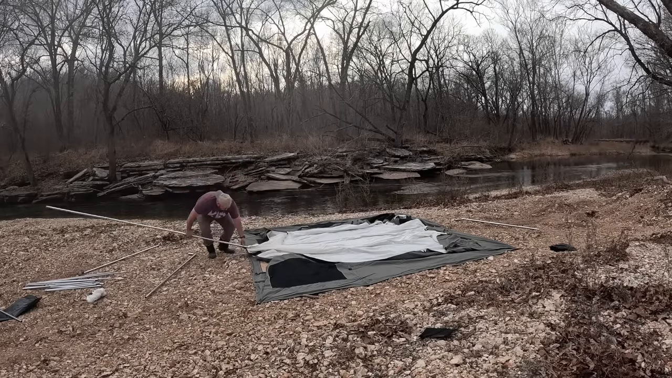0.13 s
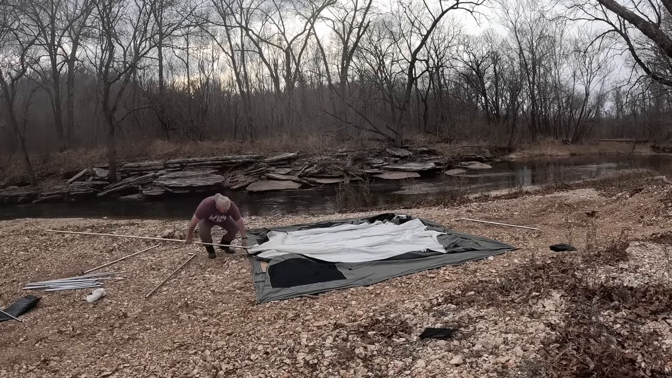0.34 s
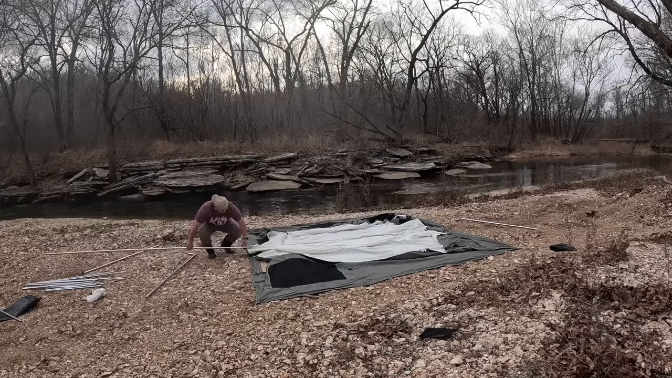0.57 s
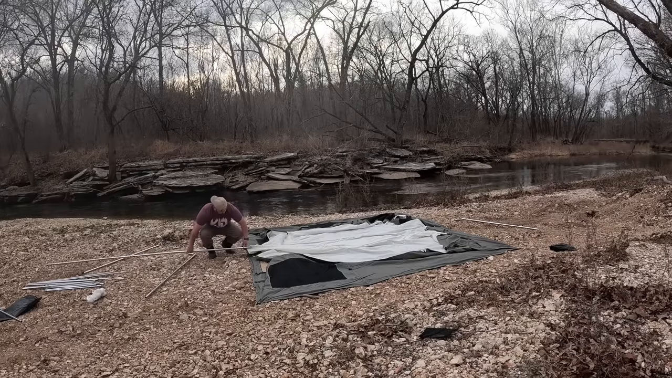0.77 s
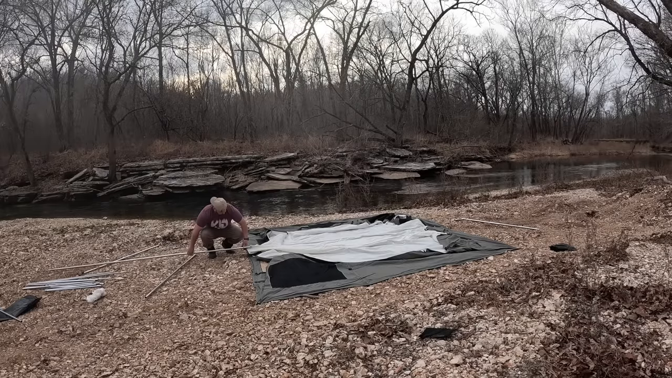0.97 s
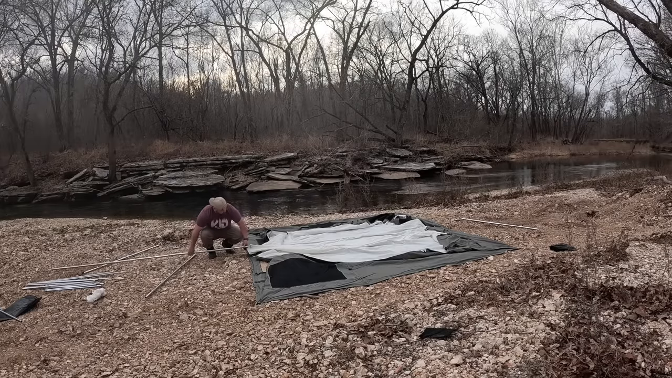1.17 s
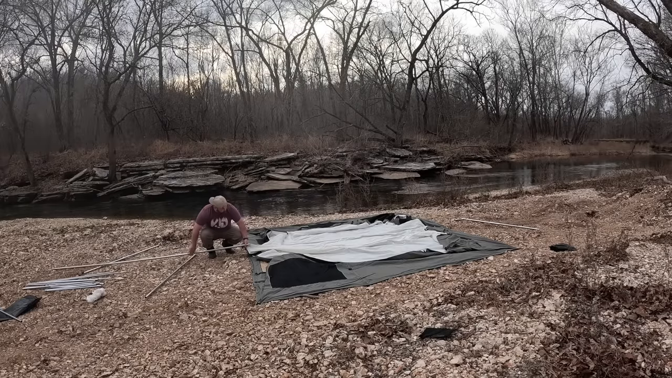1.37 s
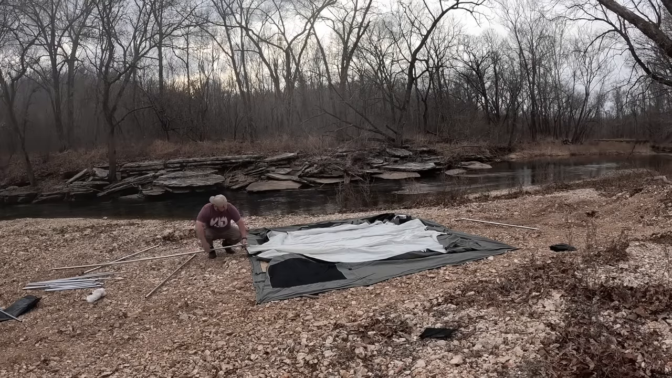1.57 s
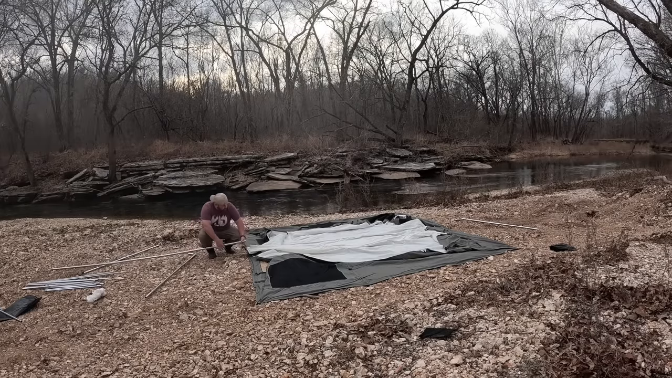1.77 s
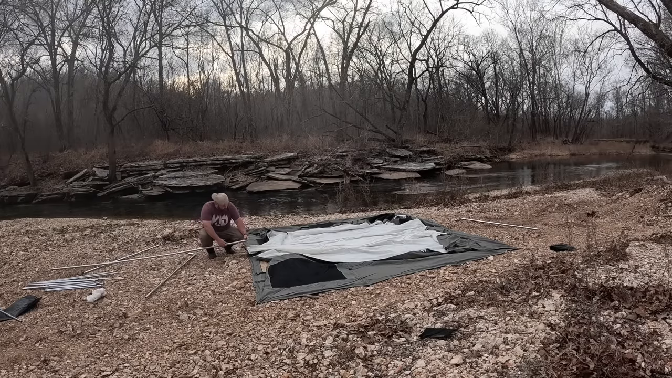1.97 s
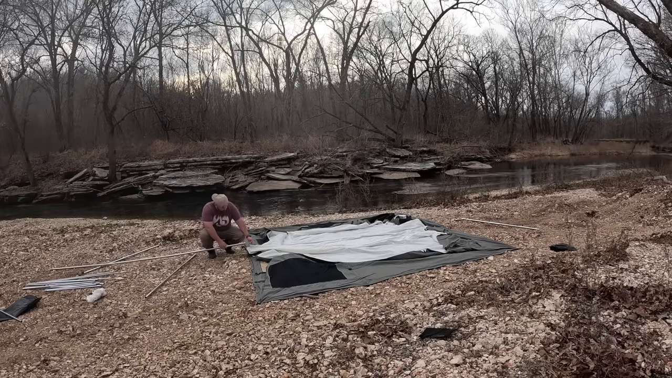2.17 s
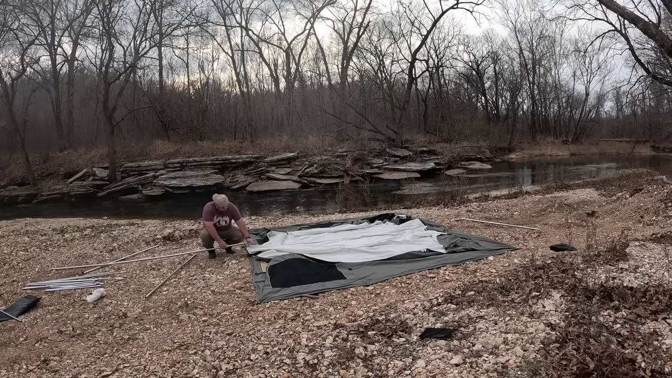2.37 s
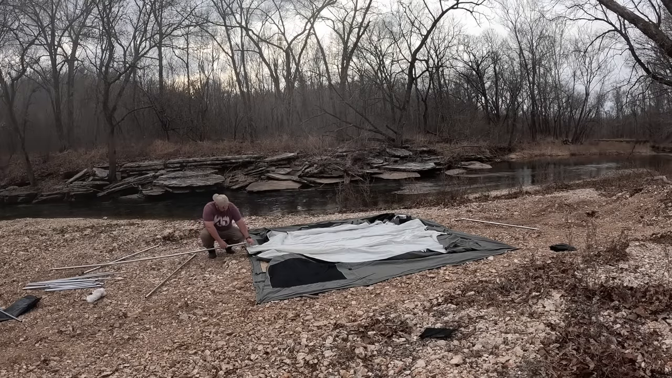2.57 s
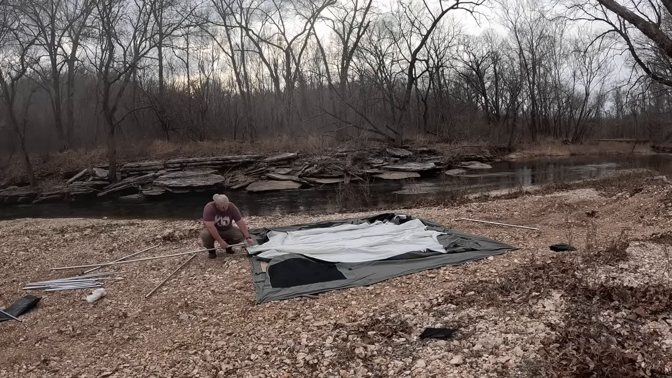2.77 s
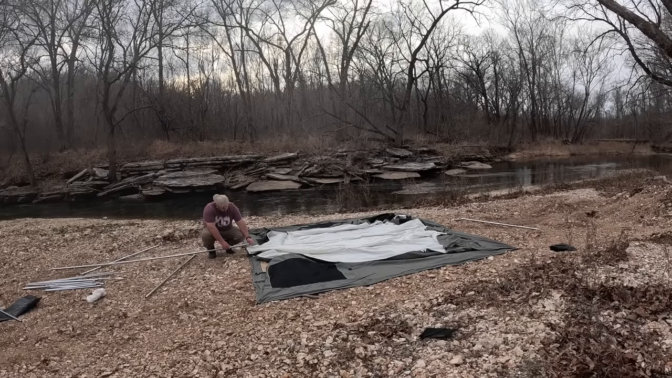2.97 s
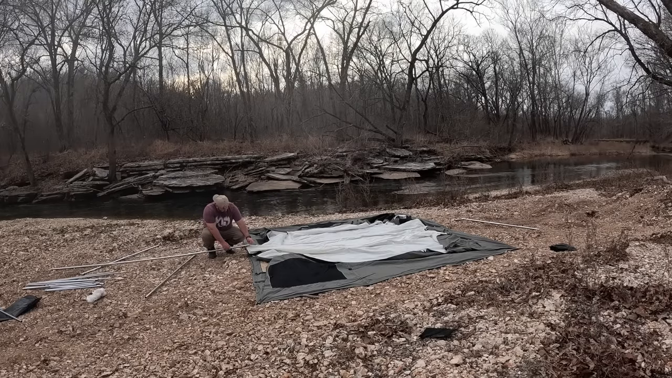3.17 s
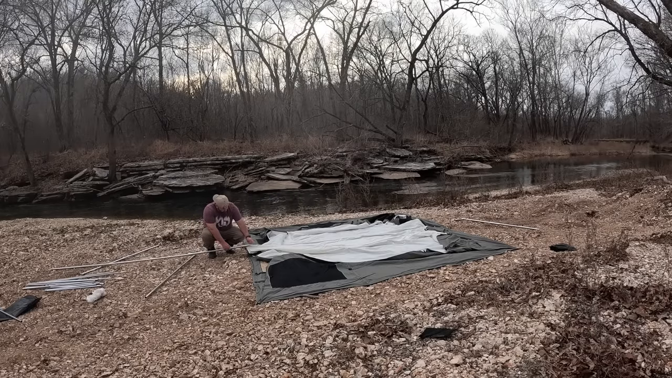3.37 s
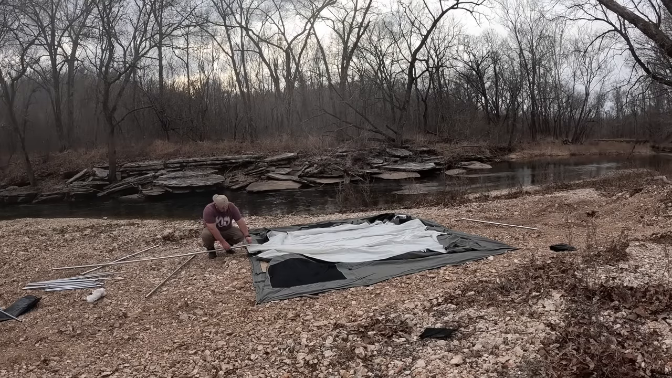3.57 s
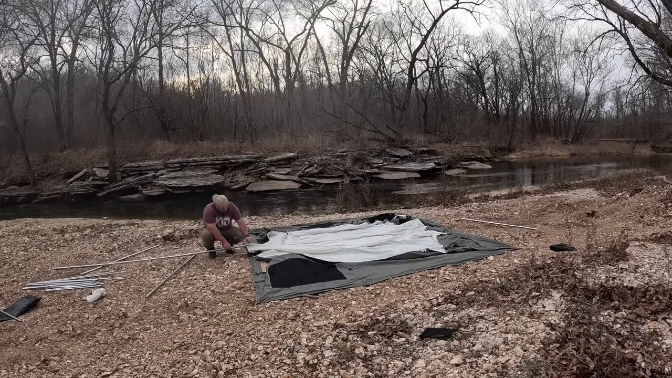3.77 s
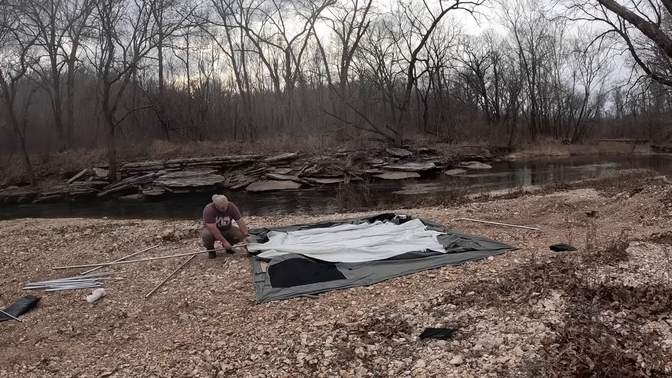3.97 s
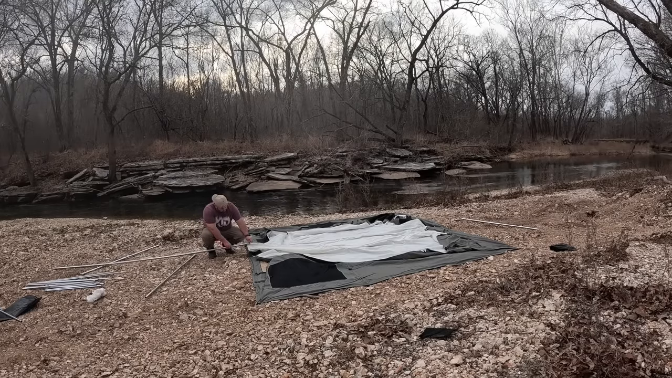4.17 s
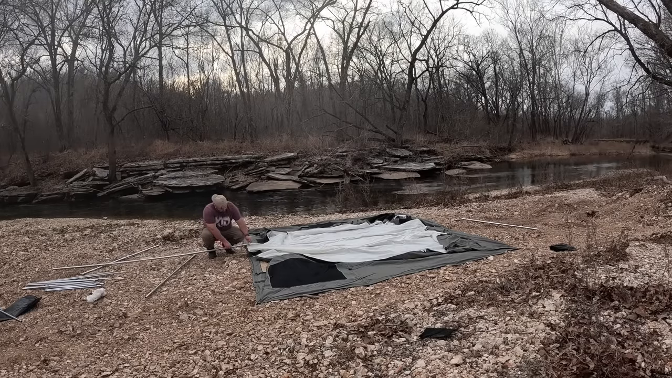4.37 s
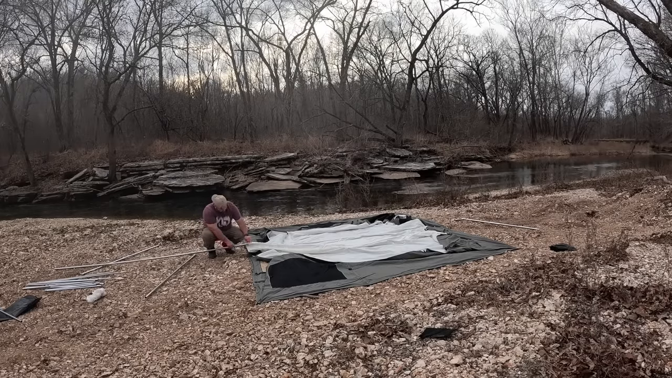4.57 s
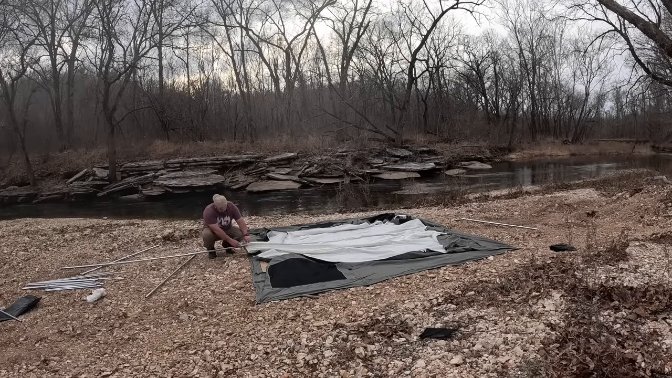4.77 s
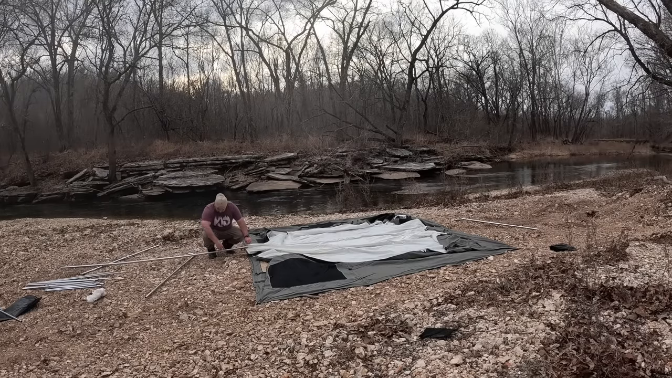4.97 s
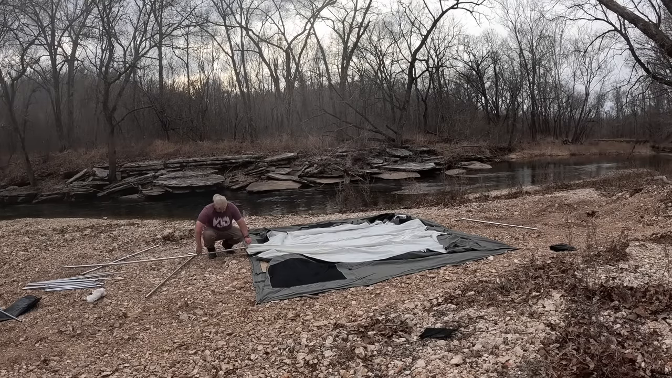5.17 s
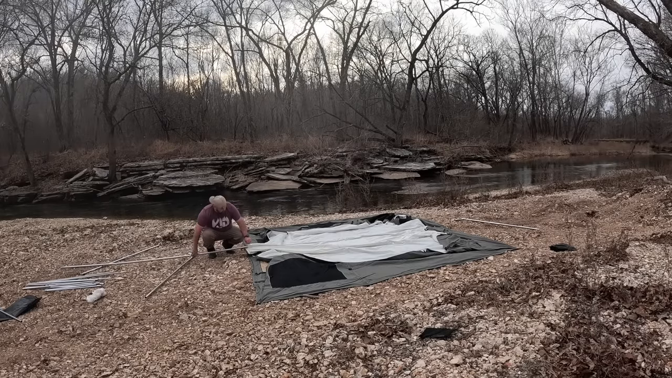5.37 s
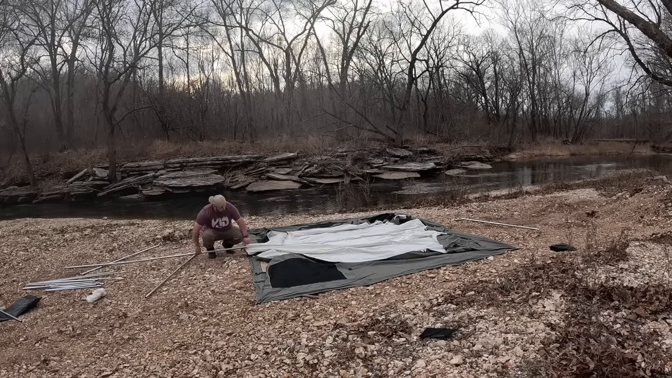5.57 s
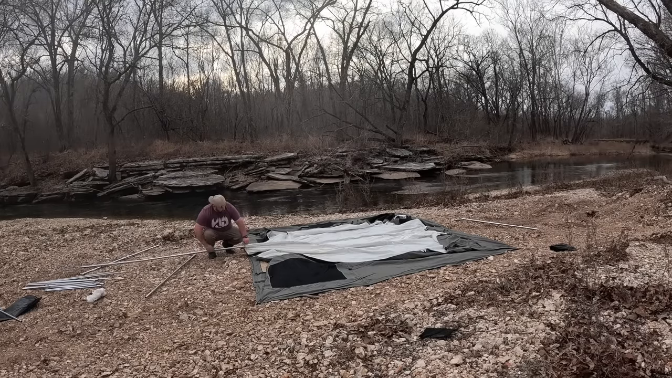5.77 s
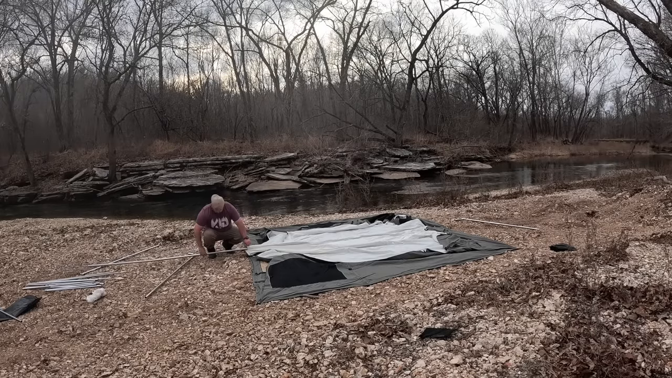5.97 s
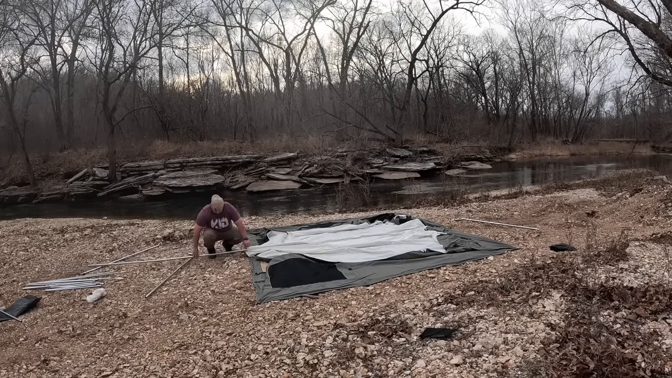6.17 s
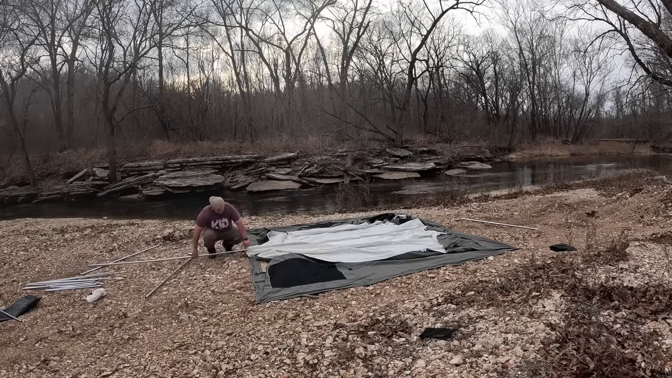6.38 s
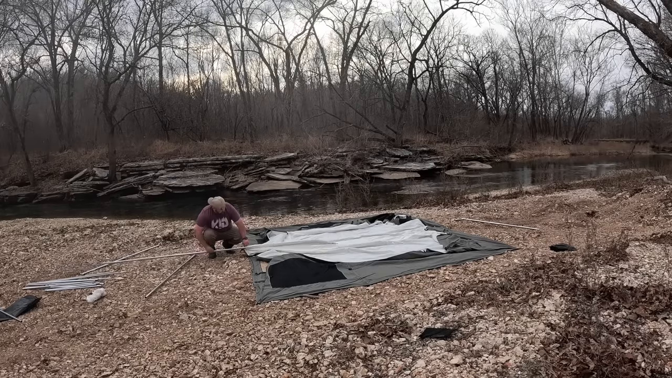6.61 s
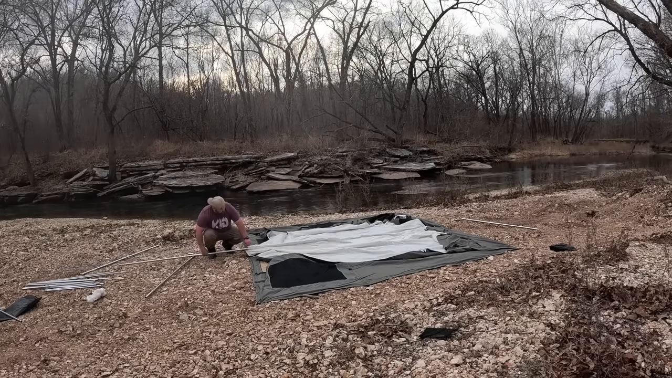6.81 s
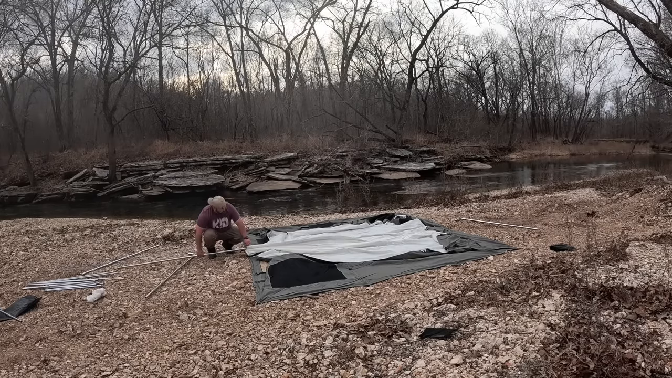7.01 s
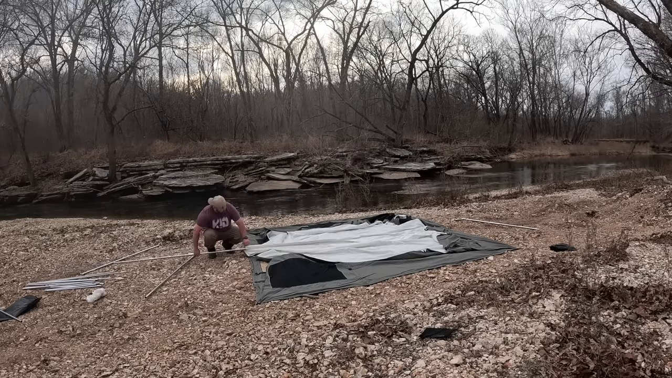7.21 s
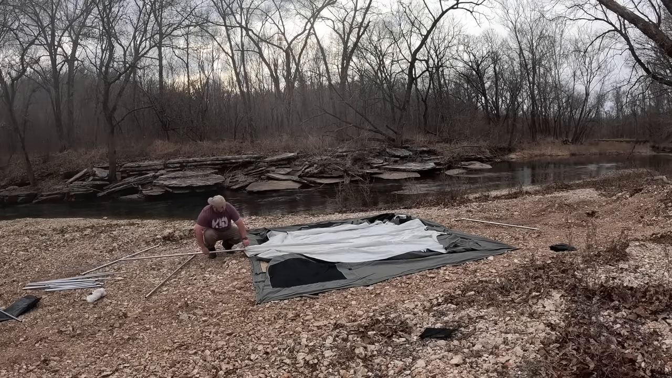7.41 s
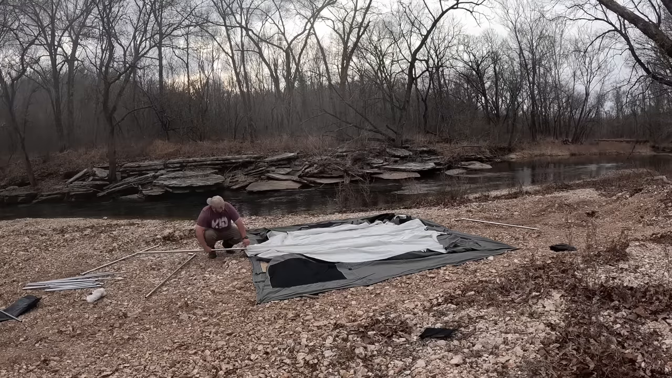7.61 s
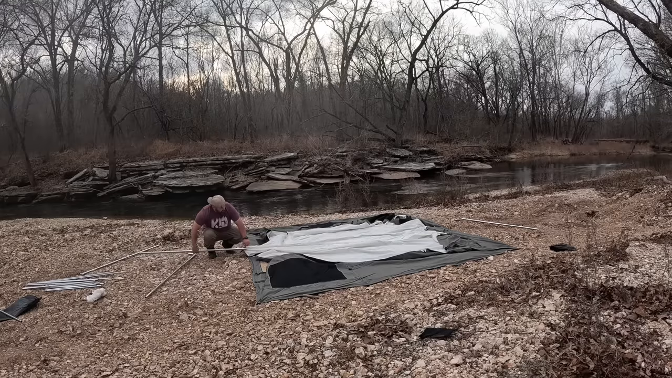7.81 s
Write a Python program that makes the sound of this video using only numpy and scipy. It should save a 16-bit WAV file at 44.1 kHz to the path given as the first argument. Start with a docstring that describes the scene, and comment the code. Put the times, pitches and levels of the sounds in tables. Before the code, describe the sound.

A shallow creek gives a soft, steady, wide hiss throughout, with tiny bubbles and a low, uneven breeze rumble on the microphones. From 0.1 to 0.9 s, pebbles crunch and tick underfoot in quick succession while cloth rubs faintly. At 1.0 s a thin metal pole knocks in a tight, bright cluster, followed by small taps and short scrapes until about 1.9 s. Then it is calmer: odd stone ticks at 2.4 to 3.1 s and a faint, falling far bird chirp near 3.4 s. Light rubbing and taps return at 4.2 to 5.0 s. From 5.57 to 5.9 s comes the strongest scraping, with rattling metallic knocks. Near 6.4 s the pole slides again, briefly squeaking, with a zip rising and falling until 6.8 s. Crisp clinks ring at 6.98 and 7.07 s, then a fainter zip at 7.4 to 7.65 s fades into the creek. The pole sits slightly left, nearly dry.

```python
"""A shallow creek hisses and a light breeze rumbles on the microphones throughout, while pebbles tick underfoot
and thin metal tent poles are pushed through a fabric sleeve, a little to the left.
Knocks and slips ring the pole's modes, filtered noise makes cloth, stones, creek and breeze,
and plain tones, gliding or steady, make the zips along the weave, short tones of the pole and a far bird."""
import sys
import numpy as np
from scipy import signal
from scipy.fft import rfft, irfft, next_fast_len
from scipy.io import wavfile
from scipy.ndimage import uniform_filter1d

SR = 44100
rng = np.random.default_rng(int(sys.argv[2]) if len(sys.argv) > 2 else 0)


def pcm_store(signal):
    """Save signal as 16-bit PCM."""
    levels = np.round(np.clip(np.atleast_2d(signal), -1, 1) * 32767)
    wavfile.write(sys.argv[1], SR, levels.astype(np.int16).T)


N = 346175  # length in samples
SIDES = np.array([[1], [-1]])  # adds to the left, subtracts from the right
POLE_PAN_DB = 2.5  # left minus right


def undb(db):
    """Turn decibels into a plain gain."""
    return 10 ** (np.asarray(db) / 20)


def level(x, db):
    """Scale a sound to an average (RMS) level."""
    return x * undb(db) / np.sqrt(np.mean(x ** 2))


def peak(x, db):
    """Scale a sound so that its highest point sits at db."""
    return x * undb(db) / np.abs(x).max()


def pan(db):
    """Left and right gains, db apart; positive leans left."""
    return undb(np.array([db, -db]).reshape(2, -1) / 2)


def curve(rows):
    """Columns of a time table, drawn as lines with one value a sample."""
    s, *columns = np.transpose(rows)
    return [np.interp(np.arange(N) / SR, s, column) for column in columns]


def spectrum(rows, hz):
    """Read a frequency table at hz, with straight lines over log frequency."""
    table_hz, value = np.transpose(rows)
    return np.interp(np.log(hz), np.log(table_hz), value)


def band(x, hz, width):
    """Keep a soft peak around hz, width in Hz."""
    return signal.lfilter(*signal.iirpeak(hz, hz / width, SR), x)


def between(x, lo_hz, hi_hz):
    """Band-pass with steep skirts."""
    return signal.sosfilt(signal.butter(4, [lo_hz, hi_hz], "bandpass", fs=SR, output="sos"), x)


def mode(x, hz, t60):
    """Damped resonance that falls 60 dB in t60 seconds; a unit impulse rings with amplitude near 1."""
    r = 1000 ** (-1 / (max(t60, .01) * SR))
    return signal.lfilter([.5, 0, -.5], [1, -2 * r * np.cos(2 * np.pi * hz / SR), r * r], x)


def walk(rate, size=N):
    """Smooth random wandering: levels held 1 / rate s and slewed twice; spread near 1."""
    held = np.repeat(rng.standard_normal(int(size * rate / SR) + 3), 8)
    smooth = uniform_filter1d(uniform_filter1d(held, 8), 8)
    return 1.3 * np.interp(np.arange(size) * 8 * rate / SR, np.arange(len(held)), smooth)


def burst(decay_s, size=2000):
    """Noise that starts at once and dies away; peak near 1."""
    return rng.standard_normal(size) / 2 * np.exp(-np.arange(size) / (SR * max(decay_s, 1e-4)))


def add(out, s, sound):
    """Mix a sound into out, starting at s seconds."""
    i = int(s * SR)
    out[..., i:i + sound.shape[-1]] += sound[..., :N - i]


# breeze rumble before its random wobble: t/s, level/dB
GUST_LEVELS = [(0.0, -78), (0.11, -68), (0.35, -72), (1.05, -71.5), (1.66, -79), (1.68, -70), (3.48, -68),
               (3.63, -80), (3.78, -65), (3.87, -79), (4.28, -68.5), (6.71, -71), (6.75, -61.5),
               (7.08, -73), (7.22, -58.5), (7.3, -76), (7.54, -59.5), (7.85, -71)]


def breeze():
    """Slow pressure swings on the microphone ports, mostly shared by both: noise below about 52 Hz."""
    low_pass = signal.butter(3, 52, fs=SR, output="sos")
    shared, own = signal.sosfilt(low_pass, rng.standard_normal((2, N)))
    pair = shared + 0.17 * own * SIDES
    return level(pair, 0) * undb(curve(GUST_LEVELS)[0] + 2.4 * walk(14)) * pan(-1.6)


# colour of the creek: f/Hz, relative level per Hz/dB
CREEK_COLOUR = [(41, -24), (70, -18), (112, -19.5), (156, -2), (390, -11.5), (697, -10), (833, -12.5),
                (1140, 0), (1860, -2.5), (4440, -12.5), (7420, -19.5), (8870, -28.5), (11900, -32.5),
                (14500, -45)]
# how alike left and right are: f/Hz, likeness [0-1]
CREEK_LIKENESS = [(60, 0.76), (130, 0.81), (290, 0.52), (640, 0.34), (1410, 0.61), (3100, 0.49),
                  (6820, 0.6), (15000, 0.094)]
# which side is louder: f/Hz, left minus right level/dB
CREEK_LEAN = [(60, -3), (110, -7), (200, -6), (380, -6.5), (700, -0.5), (1290, 6), (2380, 7.5), (4400, 2),
              (8120, 2), (15000, 9)]
# slow changes of the water: t/s, change of level/dB, extra lean to the left/dB
CREEK_FLOW = [(0, 1.3, -0.5), (1.5, -1.5, 0.5), (4, 0, 1), (6, -0.1, 0.5), (7.85, -0.5, -0.5)]
CREEK_DB = -56.5  # average level before the flow changes


def creek(bubbles=220, bubble_db=-9):
    """Third-octave noise bands swell together and flicker alone; small rising bubbles (per s) lie on top."""
    water, swell, size = 0, walk(1.924), next_fast_len(N)
    hz = np.maximum(np.fft.rfftfreq(size, 1 / SR), 1)
    noise = rfft(rng.standard_normal((2, size))) * undb(spectrum(CREEK_COLOUR, hz))
    octave = np.log2(hz)
    for centre_hz in 90 * 2 ** np.arange(0, 7.5, 1 / 3):
        # a triangle that reaches a third of an octave each way
        mid, side = noise * np.clip(1 - 3 * np.abs(octave - np.log2(centre_hz)), 0, 1)
        like = np.clip(spectrum(CREEK_LIKENESS, centre_hz), 0, 1)
        pair = np.sqrt(1 + like) * mid + np.sqrt(1 - like) * side * SIDES
        pair = pan(spectrum(CREEK_LEAN, centre_hz)) * pair
        water = water + undb(0.81 * swell + 1.02 * walk(9)) * irfft(pair, size)[:, :N]

    drops, t = np.zeros(N), np.arange(900) / SR
    for when, pitch, strength in rng.random((int(bubbles * N / SR), 3)):
        f = 1000 * 2.6 ** pitch
        rising_tone = np.sin(2 * np.pi * f * t * (1 + .004 * f * t))
        # cubing makes most bubbles faint
        add(drops, when * N / SR, strength ** 3 * np.exp(-t * f / 6) * rising_tone)

    both = level(water, CREEK_DB) + level(drops, CREEK_DB + bubble_db) * pan(3.4)
    flow_db, lean_db = curve(CREEK_FLOW)
    return both * undb(flow_db) * pan(lean_db)


# pebbles underfoot, peaks before panning: t/s, treble level/dB, middle level/dB, thud level/dB
PEBBLE_STEPS = [(0.11, -44.5, -50, -70), (0.1217, -52, -47, -62), (0.163, -47, -43, -57),
                (0.204, -46, -49, -57), (0.263, -43, -41, -56.5), (0.2812, -41.5, -48, -74),
                (0.3147, -41, -34, -50), (0.3887, -59, -37.5, -52), (0.479, -45, -39.5, -57),
                (0.5436, -45, -49, -57), (0.5939, -44, -55, -61), (0.736, -38, -61, -45),
                (0.8603, -44.5, -45, -73), (0.9366, -53, -49, -63), (2.435, -47, -49, -63),
                (2.7237, -53, -46, -85), (2.9796, -55, -57, -69), (3.13, -64, -45.5, -88),
                (3.5994, -66, -54, -81), (3.8494, -50, -67, -81), (4.0576, -50, -61, -71),
                (4.4102, -44.5, -61, -60), (5.194, -46, -43, -83), (5.34, -48, -64, -80),
                (1.717, -58, -44, -61), (4.97, -62, -54, -55.5), (5.05, -66, -48, -63),
                (7.0, -66, -41, -51)]


def pebbles():
    """Stone ticks with a short middle knock and a dull thud of the ground: three filtered noise bursts."""
    out = np.zeros(N)
    for s, tick_db, mid_db, thud_db in PEBBLE_STEPS:
        tick = between(burst(0.0024), 2250, 7830) + 0.17 * between(burst(0.0011), 9600, 12000)
        knock = band(burst(0.0015), 1210, 310)
        thud = band(band(burst(0.025), 230, 150), 230, 390)
        for sound, db in (tick, tick_db), (knock, mid_db), (thud, thud_db):
            add(out, s, peak(sound, db))
    return out * pan(2.1)


# far bird: t/s, f/Hz, nominal level/dB
BIRD_CHIRP = [(3.38, 3430, -65), (3.43, 3350, -65), (3.5, 2700, -61)]
# the weave zips under the sliding tip, pitch follows speed; one list a zip: t/s, f/Hz, nominal level/dB
WEAVE_ZIPS = [
    [(6.5, 1547, -58), (6.55, 2080, -54), (6.588, 2593, -54), (6.62, 2990, -47), (6.645, 3195, -52),
     (6.665, 3160, -49), (6.7, 2980, -55), (6.73, 2886, -52), (6.765, 2720, -62), (6.8, 1850, -57.5),
     (6.83, 1569, -65)],
    [(7.36, 1255, -60.5), (7.384, 1627, -57), (7.466, 2657, -62), (7.526, 2941, -57.5), (7.618, 2200, -65),
     (7.66, 1971, -72)],
]


def zips(width_hz=260, clean=0.51, uneven_db=4.5):
    """A gliding tone: threads plucked in turn, unevenly, part line and part narrow noise; a far bird blurs alike."""
    out = np.zeros(N)
    for rows in [*WEAVE_ZIPS, BIRD_CHIRP]:
        hz, db = curve(rows)
        start, end = rows[0][0], rows[-1][0]
        inside = np.interp(np.arange(N) / SR, [start - .02, start, end, end + .02], [0, 1, 1, 0])
        blur = clean + 0.68 * walk(width_hz) + 0.37 * walk(900)
        tone = np.sqrt(2) * np.sin(2 * np.pi * np.cumsum(hz) / SR)
        out += inside * undb(db + uneven_db * walk(30)) * blur * tone
    return out * pan(0.5)


# pushes of the pole along the sleeve: start t/s, rise t/s, hold t/s,
# relative slip force level/dB, relative cloth hiss level/dB
PUSHES = [(0.085, 0.03, 0.43, -72, -71), (0.704, 0.022, 0.03, -69.5, -67), (1.013, 0.018, 0.12, -62, -71),
          (1.266, 0.018, 0.082, -67, -72), (1.392, 0.035, 0.041, -60, -61), (1.52, 0.037, 0.091, -69, -71),
          (1.707, 0.037, 0.034, -64.5, -74), (1.896, 0.038, 0.085, -71.5, -80),
          (2.403, 0.045, 0.56, -78, -84), (2.897, 0.096, 0.02, -68, -70), (3.494, 0.036, .25, -82, -81),
          (3.83, 0.042, 0.3, -75, -79), (4.404, 0.068, 0.067, -64, -66), (4.552, 0.016, 0.22, -59, -60.5),
          (4.967, 0.02, 0.02, -77, -78), (5.3, 0.047, 0.43, -79, -74), (5.57, 0.017, .03, -56, -57),
          (5.618, .02, 0.16, -50, -53), (5.76, 0.013, 0.022, -54, -53.5), (5.827, .01, 0.046, -49.5, -52),
          (5.894, 0.0088, 0.016, -59, -61), (6.41, 0.12, 0.02, -52.5, -57.5),
          (6.589, 0.048, 0.14, -66, -62), (6.732, 0.043, 0.058, -69, -58.5),
          (7.084, 0.017, 0.046, -69, -66), (7.303, 0.06, 0.38, -71, -62)]
STROKE_T60_S, REST_DB = 0.34, -86  # dying away, faint fidgeting between pushes
UNEVEN_DB = 1.6  # wobble of the hand


def strokes(step=32):
    """Gains of scrape and hiss: every push rises, holds and dies away, a little unevenly."""
    t = np.arange(0, N, step) / SR
    power = np.ones((2, len(t))) * undb(REST_DB) ** 2
    for s, rise_s, hold_s, *db in PUSHES:
        rise = np.clip((t - s) / max(rise_s, .002), 0, 1) ** 2
        fall = undb(-60 * np.maximum(t - s - rise_s - hold_s, 0) / STROKE_T60_S)
        power += np.outer(undb(db), rise * fall) ** 2
    return np.repeat(np.sqrt(power), step, axis=1)[:, :N] * undb(UNEVEN_DB * walk(22))


# noise bands of the cloth: low f/Hz, high f/Hz, relative level/dB
CLOTH_BANDS = [(1030, 4140, -1), (3770, 6600, -15), (7500, 9550, -11.5), (9650, 12570, -7.5)]
# modes of the pole, rung by drag and clinks: f/Hz, relative level/dB, t60 when free/s
# slow bending
BEND = [(1040, -8, .17), (1195, -2, .06), (1370, -7, .06), (1525, -3, .08), (1670, -4, .06),
        (1800, -6, .06)]
# faster bending, above it in pitch
FLEX = [(2080, -8, .06), (2325, 0, .07), (2600, -9, .06), (2890, -2, .085), (3035, -3, .11),
        (3300, -8, .07)]
# long ring of the tube wall
RING = [(3662, -7, .08), (3835, -8, .1), (3925, -13, .5), (3960, -16, .7), (4008, -13, .6),
        (4087, -10, .35), (4178, -3, .19), (4245, -7, .28), (4308, -11, .35), (4410, -14, .35)]
# bright cluster
BRIGHT = [(4603, -12, .15), (4787, -12, .1), (5030, -8, .07), (5139, -4, .13), (5298, -6, .1),
          (5450, -7, .13), (5592, -7, .13), (5675, -8, .09), (5770, -9, .08), (5888, -4, .1),
          (6068, -6, .13), (6175, -8, .09), (6240, -9, .11), (6434, -6, .14), (6550, -11, .3),
          (6745, -8, .09), (6880, -6, .1), (7090, -5, .08), (7220, -9, .08), (7375, -9, .1),
          (7650, -12, .09)]


def drag(slips=3000, slip_db=2.5, damp=0.34, low_db=-11, ring_db=-4.0, grit_db=-6):
    """Stick-slip clicks (slips per s) ring the pole, damped by the sleeve; the cloth itself hisses."""
    scrape, hiss = strokes()
    slip = (rng.random(N) < slips / SR) * rng.standard_normal(N) * undb(slip_db * walk(150))
    slip = level(slip, 0) * scrape

    metal = 0
    for modes, family_db in (BEND, low_db), (FLEX, low_db), (RING, ring_db), (BRIGHT, 0):
        for hz, mode_db, t60 in modes:
            gain = undb(family_db + mode_db / 2 + 3.7 * walk(24)) / np.sqrt(t60)
            metal = metal + gain * mode(slip, hz, damp * t60)
    metal = undb(-34.0) * between(metal, 1100, 8240)
    grit = undb(grit_db) * between(slip, 7000, 8770)

    shared, own = rng.standard_normal((2, N))
    rub = shared + .5 * own * SIDES
    cloth = sum(undb(db + 2.0 * walk(21)) * between(rub, lo, hi) for lo, hi, db in CLOTH_BANDS)
    return (metal + grit) * pan(1.2) + hiss * level(cloth, 0) * pan(1.5)


# short steady tones of the pole, rubs that sing and one low ring at 620 Hz:
# start t/s, length t/s, f/Hz, nominal level/dB
POLE_TONES = [(4.565, .04, 7375, -57), (4.74, .05, 2330, -62), (4.985, 0.043, 2500, -56),
              (4.99, 0.036, 2840, -58), (6.4, .05, 6000, -67.5), (6.494, 0.042, 6880, -48),
              (6.508, .035, 1660, -50.5), (6.53, .025, 7650, -54), (6.55, .11, 6434, -73),
              (5.65, 0.068, 6600, -50), (5.78, .04, 4008, -49), (6.647, .005, 5500, -52),
              (7.0, 0.039, 620, -56.5), (1.4, 0.037, 6240, -59), (1.3, 0.06, 5592, -60)]


def sings(width_hz=70, clean=0.66, edge_s=0.016):
    """Short steady tones of the pole, wavering in strength: rubs that sing, and one low ring at 620 Hz."""
    out, t = np.zeros(N), np.arange(6000) / SR
    for s, length_s, hz, db in POLE_TONES:
        shape = np.clip(np.minimum(t, length_s + edge_s - t) / edge_s, 0, 1)
        waver = clean + 0.42 * walk(width_hz, size=len(t))
        add(out, s, undb(db) * shape * waver * np.sqrt(2) * np.sin(2 * np.pi * hz * t))
    return out * pan(POLE_PAN_DB)


# top modes of the pole: f/Hz, relative level/dB, t60 when free/s
TOP = [(8110, -3, .07), (8400, -3, .06), (9120, 0, .05), (10350, -3, .06), (11050, -6, .07)]
# between the clear modes lie many short, close ones, heard as a noisy swarm;
# one row a family, from bend to top: low f/Hz, high f/Hz, relative level/dB, t60 when free/s
MODE_SWARMS = [(966, 1950, -6.5, 0.1), (1950, 3600, -6, 0.08), (3500, 4500, -10, 0.04),
               (4460, 7660, -8, 0.09), (7840, 16000, -5.5, 0.1)]
# knocks of the pole: t/s, relative level/dB of the bright, bend, flex, ring and top modes,
# favoured bend f/Hz, favoured ring f/Hz, favoured bright f/Hz, share of free ring time [0-1]
KNOCKS = [(0.9973, -21, -25.5, -24, -38, -42, 1380, 4010, 5080, 1),
          (1.0038, -24, -29, -28, -32, -35, 1200, 3660, 7030, 1),
          (1.0116, -20, -33, -24, -36, -33.5, 1510, 3750, 5900, 0.67),
          (1.044, -49, -37.5, -44, -40.5, -55, 1120, 3890, 5130, .98),
          (1.087, -38.5, -33.5, -36.5, -56, -54, 1680, 4140, 6070, 1),
          (1.124, -60, -43.5, -58, -51, -70, 1030, 3945, 5620, 1),
          (1.287, -49, -73, -64, -70, -66, 1600, 3940, 6150, 0.43),
          (1.3105, -56, -76, -75, -68, -54, 1760, 3900, 7400, .3),
          (1.404, -57, -66, -54, -64, -60, 1670, 4040, 5470, 0.63),
          (1.438, -50, -62, -48.5, -73, -62, 1250, 3940, 6000, 1),
          (1.477, -57, -64, -48.5, -59, -65, 1870, 3940, 5640, .95),
          (1.518, -51, -70, -58, -59, -58, 1530, 3970, 5160, 0.68),
          (1.729, -48.5, -53, -55, -80, -65, 1270, 3940, 7200, 0.98),
          (1.775, -49, -63, -49, -77, -72, 1280, 3940, 6940, 1),
          (1.9416, -52, -50, -62, -80, -64, 1420, 3960, 5970, 0.69),
          (4.1809, -48.5, -52, -56, -75, -66, 1410, 3950, 7240, 0.35),
          (4.463, -61, -46, -60, -62, -61, 1570, 3900, 5060, 0.47),
          (4.575, -48, -67, -53, -58, -57, 1830, 3920, 7400, 0.55),
          (4.735, -51, -52, -62, -51, -65, 1360, 4000, 6450, 1),
          (5.574, -37, -39.5, -35.5, -49, -60, 2310, 3880, 6700, 0.86),
          (5.609, -34.5, -50, -51, -70, -54, 2325, 4000, 7260, 0.57),
          (5.6253, -45, -69, -62, -60, -45, 1660, 4100, 5500, .3),
          (5.632, -42, -67, -62, -60, -44, 1660, 3930, 5070, 0.54),
          (5.739, -29, -57, -37, -37, -44, 2600, 4400, 4620, 0.46),
          (5.7512, -32, -54, -40, -35, -42, 1640, 4170, 4940, 0.69),
          (5.763, -31, -70, -34.5, -32.5, -32.5, 2325, 4060, 5720, 0.75),
          (5.838, -39, -37.5, -47, -45, -55, 1760, 3930, 5600, 1),
          (5.885, -37, -30.5, -36, -43, -42, 980, 4050, 5740, 0.91),
          (5.892, -41, -50, -51, -34, -46, 1035, 4140, 5550, 0.18),
          (6.0066, -71, -50, -56, -47, -71, 1420, 4070, 5100, 0.26),
          (6.54, -54, -68, -62, -54, -61, 1760, 3945, 5400, 0.65),
          (6.714, -50, -47.5, -52, -56, -61, 1760, 4340, 4700, 0.74),
          (6.899, -54, -54, -68, -53, -70, 1420, 4100, 5000, 0.13),
          (6.9754, -30, -46, -33, -28.5, -44.5, 2325, 4240, 5410, 0.53),
          (6.9767, -42, -58, -52, -43, -52, 2325, 4330, 6300, 1),
          (6.998, -49, -45, -48, -60, -57, 1290, 4180, 6430, 1),
          (7.07, -27, -45, -31.5, -32.5, -42.5, 2325, 3660, 6220, 0.48),
          (7.083, -54, -54, -56, -48, -56, 1680, 4330, 6550, 1),
          (7.2485, -56, -67, -64, -45.5, -74, 1390, 3662, 4930, 0.08),
          (7.301, -70, -60, -70, -51, -66, 1090, 3835, 5490, 0.39)]
THUD_UNDER_BEND_DB = -17


def clinks(spot_db=1.0, chatter_s=0.0053, favour_db=11, crack_db=12, ring_crack_db=14,
           swarm_favour=2.35, wide=0.29, size=16000):
    """Each knock is one blow plus a short chatter of the loose joint; where it lands favours some modes."""
    out = np.zeros((2, N))
    for s, bright_db, bend_db, flex_db, ring_db, top_db, bend_hz, ring_hz, bright_hz, free in KNOCKS:
        free = np.clip(free, .05, 1)
        push = burst(chatter_s, size=size)
        push[0] += 14  # the blow itself
        push /= np.sqrt(np.sum(push ** 2))

        # a blow that bends the pole also bumps the ground or the hand
        thud = band(burst(0.024, size=size), 636, 58)
        thud = thud + 0.59 * band(band(burst(0.032, size=size), 220, 180), 224, 240)
        sound, side = peak(thud, bend_db + THUD_UNDER_BEND_DB), 0

        families = (BEND, FLEX, RING, BRIGHT, TOP)
        levels_db = (bend_db, flex_db, ring_db, bright_db, top_db)
        for modes, db, (lo_hz, hi_hz, swarm_db, swarm_t60) in zip(families, levels_db, MODE_SWARMS):
            hz, weight_db, t60 = np.transpose(modes)
            near = np.exp(-((hz - bend_hz) / 150) ** 2)
            near += np.exp(-((hz - ring_hz) / 70) ** 2)
            near += np.exp(-((hz - bright_hz) / 350) ** 2)
            weight = undb(weight_db + favour_db * near + spot_db * rng.standard_normal(len(hz)))
            weight *= rng.choice([-1, 1], len(hz)) / np.sqrt(np.sum(weight ** 2))

            # a grip damps the wall ring least
            kept = free ** 0.77 if modes is RING else free
            clear = sum(g * mode(push, f, kept * t) for g, f, t in zip(weight, hz, t60))
            # the pole swings, so its tones flutter
            clear *= 1 + .15 * walk(72, size=size) + .25 * walk(22, size=size)

            # two separate noises: one for the middle, one for width
            decay_s = free * swarm_t60 / np.log(1000)
            swarm, echo = (between(burst(decay_s, size=size), lo_hz, hi_hz) * np.sqrt(SR / (hi_hz - lo_hz))
                           for _ in range(2))
            swarm = swarm + swarm_favour * band(swarm, bright_hz, 1300)
            sound = sound + undb(db) * (clear + undb(swarm_db) * swarm)
            # the top modes reach the nearer port, on the left, more
            side = side + undb(db + swarm_db) * (wide * echo + .15 * (modes is TOP) * swarm)

        # the first contact is a bare crack, plainest where the grip is tight
        crack_gain = undb(max(bright_db + crack_db, ring_db + ring_crack_db)) / np.sqrt(free)
        sound = sound + crack_gain * between(burst(0.00016, size=size), 1700, 6000)
        add(out, s, sound + side * SIDES)
    return out * pan(POLE_PAN_DB)


def scene():
    """Mix the near sounds and their faint echo with the creek and the breeze."""
    near = clinks() + sings() + drag() + zips() + pebbles()
    # the far bank and the trees send back a faint, wide blur
    tail = rng.standard_normal((2, 12000)) * np.exp(-np.arange(12000) / (SR * .05))
    blur = undb(-48.5) * signal.fftconvolve(near, tail, axes=1)[:, :N]
    return near + blur + creek() + breeze()


EDGE_HZ, TOP_HZ = 13650, 15600


def record(dry):
    """Softens the treble above EDGE_HZ and removes nearly everything above TOP_HZ."""
    soft = signal.sosfilt(signal.ellip(5, .5, 26, EDGE_HZ, fs=SR, output="sos"), dry)
    return signal.sosfilt(signal.ellip(8, .2, 70, TOP_HZ, fs=SR, output="sos"), soft)


dry = scene()
out = record(dry)
pcm_store(out)
```